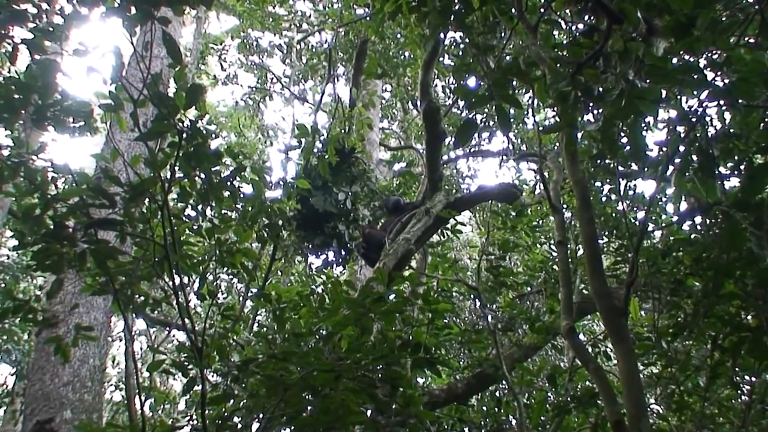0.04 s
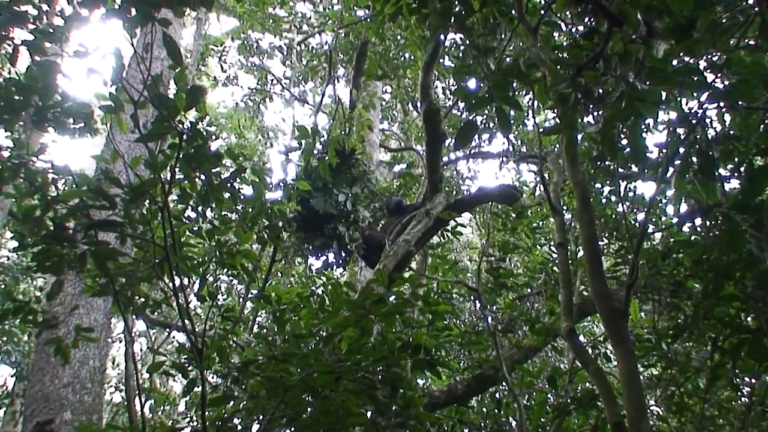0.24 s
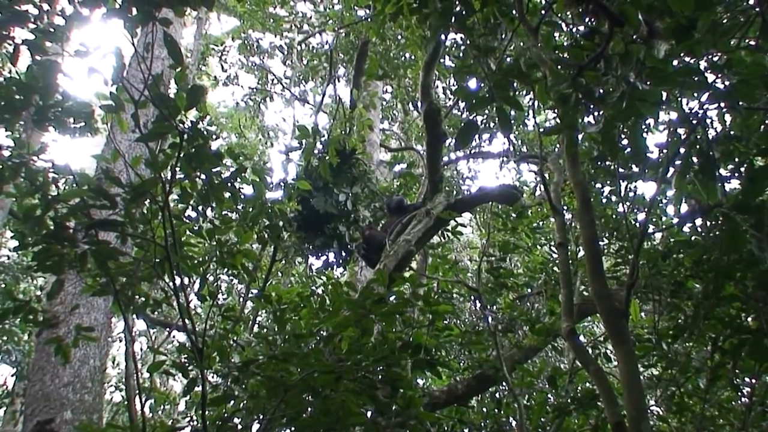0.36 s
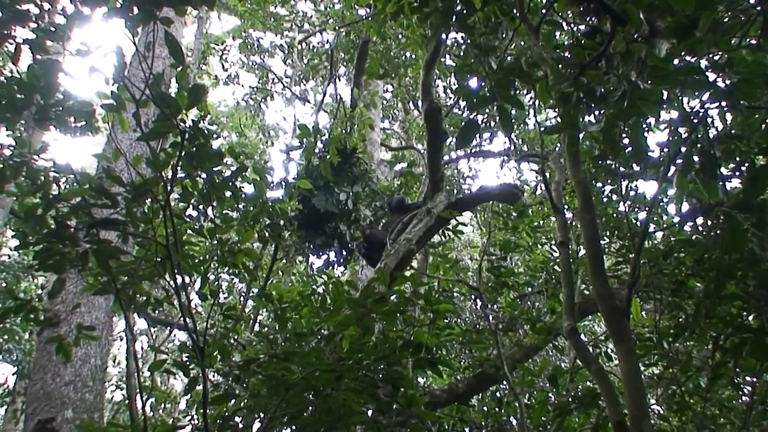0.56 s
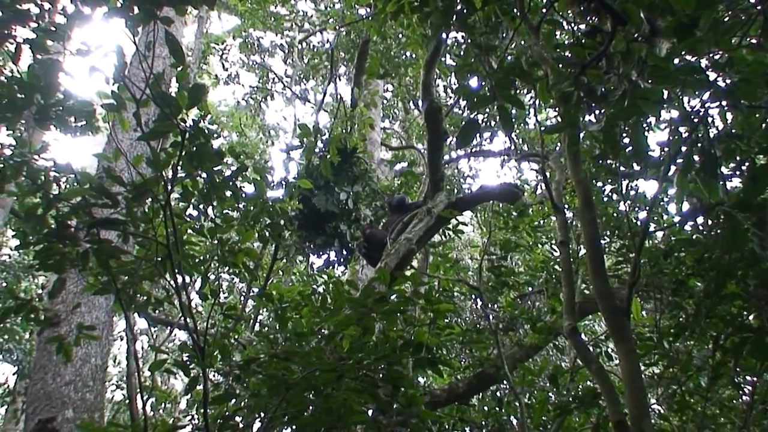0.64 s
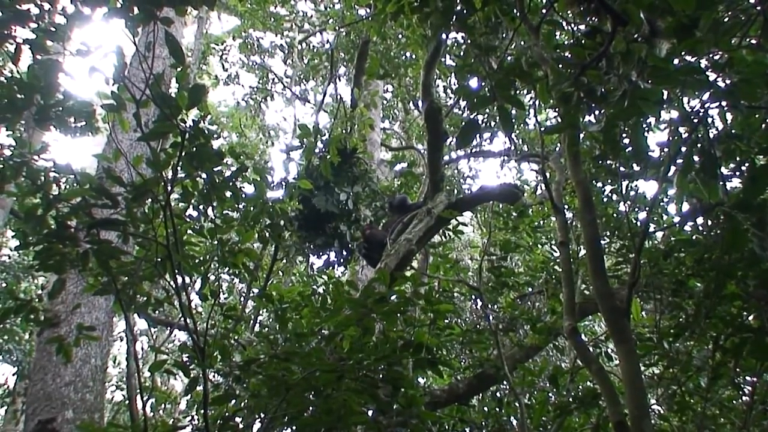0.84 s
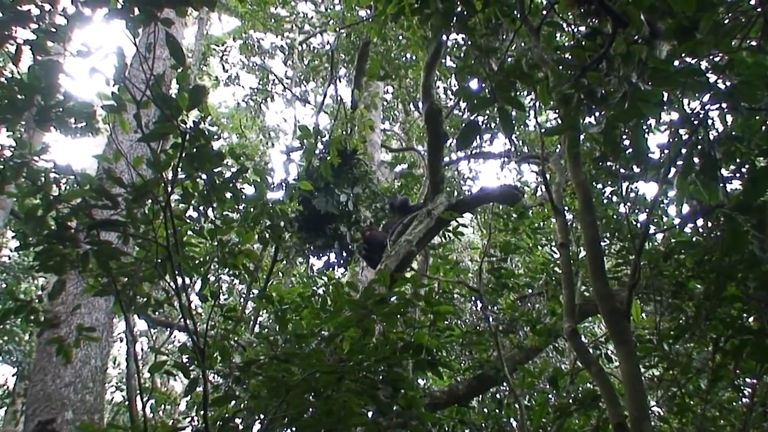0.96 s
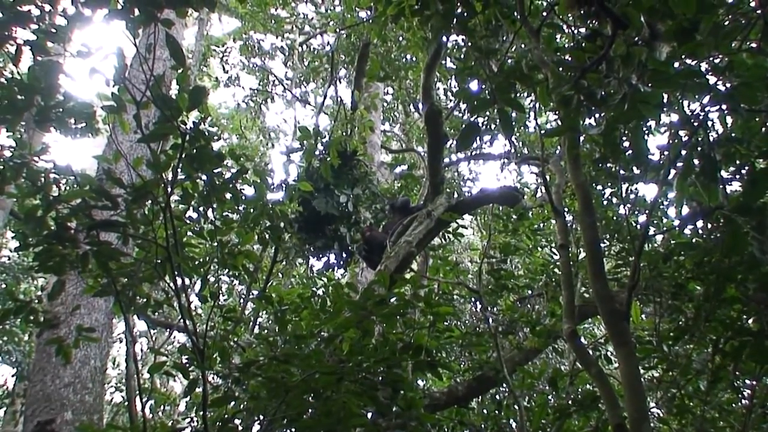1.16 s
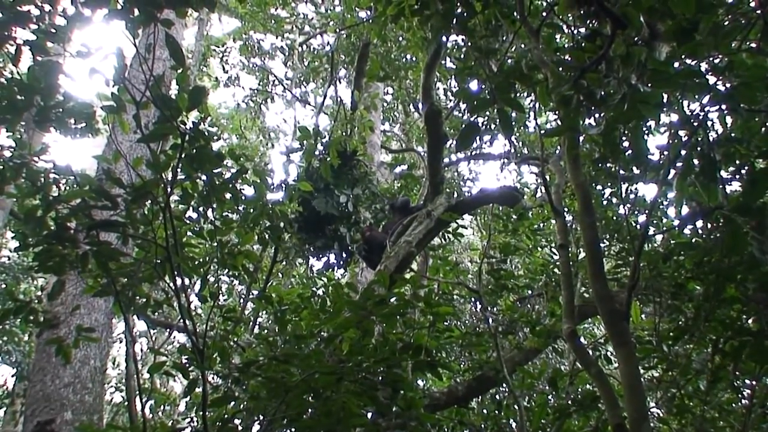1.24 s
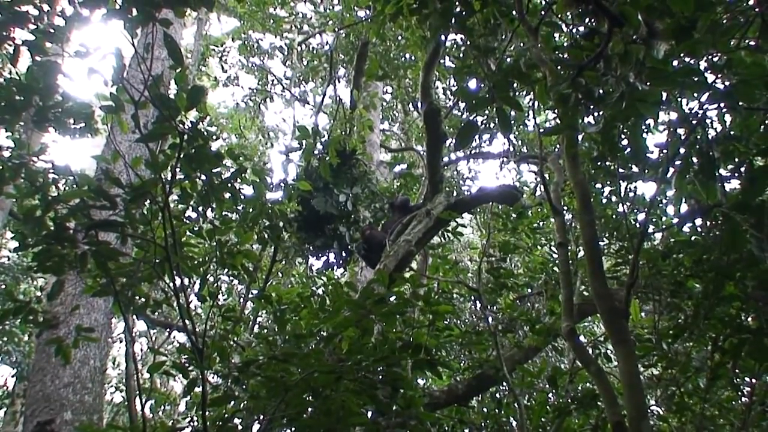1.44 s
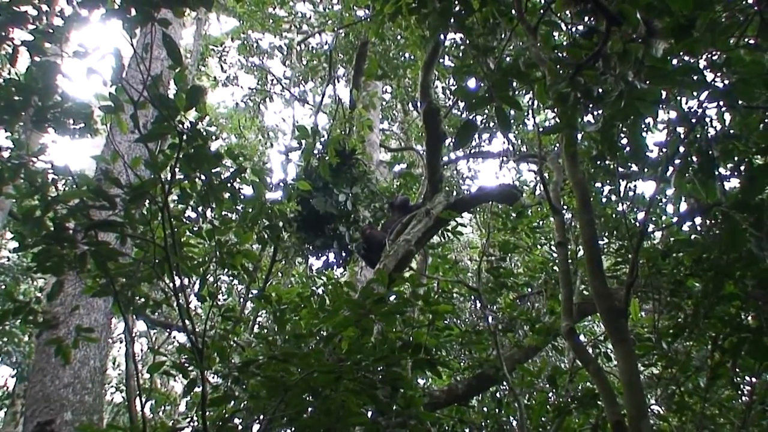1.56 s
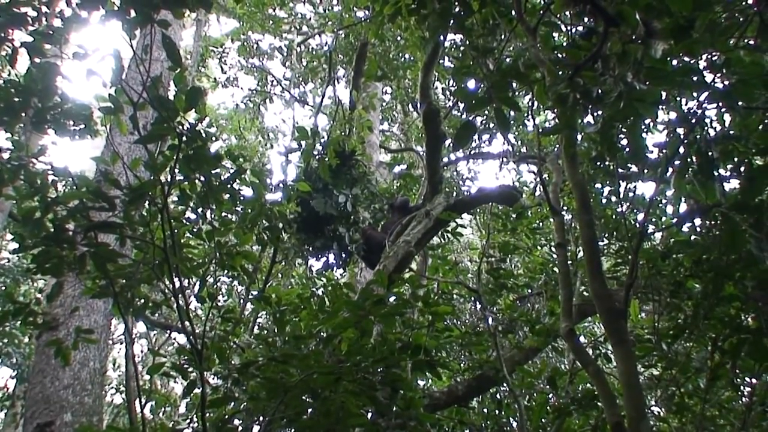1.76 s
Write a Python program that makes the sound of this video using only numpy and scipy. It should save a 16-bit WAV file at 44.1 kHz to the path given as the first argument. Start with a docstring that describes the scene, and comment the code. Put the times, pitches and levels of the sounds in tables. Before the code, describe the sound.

A chimpanzee gives two loud, hoarse hoots in quick succession, each rising then falling in pitch and lightly thumping the microphone. They echo through the forest as an insect hiss swells and a distant animal answers faintly.

```python
"""An earlier hoot is dying away in a forest as a chimpanzee gives two loud, hoarse hoots from a tree.
Each arches up and falls in pitch: jittery vocal folds are the source, the throat and mouth the filter.
The loudest peaks thump the microphone, and leaves and trunks scatter each hoot into a long echo.
As it decays, insects hiss and swell over the steady air, and a far animal answers faintly."""
import sys
import numpy as np
from scipy import signal
from scipy.fft import rfft, irfft
from scipy.io import wavfile
from scipy.ndimage import uniform_filter1d, minimum_filter1d

SR = 44100
rng = np.random.default_rng(int(sys.argv[2]) if len(sys.argv) > 2 else 0)


def unload_wav(signal):
    """Save mono or channel-first audio to the path in sys.argv[1] as 16-bit WAV at rate SR, clipped to [-1, 1]."""
    wavfile.write(
        sys.argv[1],
        SR,
        np.round(np.clip(np.atleast_2d(signal).T, -1, 1) * 32767).astype(np.int16),
    )


N = 79380
T = np.arange(N) / SR


def amp(db):
    """Amplitude grows tenfold for every 20 dB."""
    return 10 ** (np.asarray(db) / 20)


def unit(x):
    """Normalisation to an rms of 1."""
    return x / np.sqrt(np.mean(x ** 2) + 1e-20)


def read(points, hz):
    """Interpolation of (Hz, value) points on a log-frequency axis."""
    f, value = np.transpose(points)
    return np.interp(np.log(hz + 1), np.log(f), value)


def colour(x, points):
    """Minimum-phase filtering: a curve of (Hz, dB) points determines a causal response."""
    size = 2 * N
    log_gain = np.log(amp(read(points, abs(np.fft.fftfreq(size, 1 / SR)))))
    response = np.exp(np.conj(signal.hilbert(log_gain)))[:N + 1]
    return irfft(rfft(x, size) * response)[..., :N]


def wobble(rate_hz):
    """Low-passed noise gives smooth random motion up to the given rate."""
    hz = np.fft.rfftfreq(N, 1 / SR)
    return unit(irfft(rfft(rng.standard_normal(N)) / (1 + (hz / rate_hz) ** 4), N))


# Likeness of the background in both ears. Each row: frequency in Hz, correlation from 0 to 1.
EAR_CORRELATION = [(30, 0.2), (60, 0.75), (125, 0.94), (300, 0.99), (2000, 1), (5000, 0.97), (9000, 0.9),
                   (12000, 0.3)]

def hiss(spectrum, patchy_db):
    """A diffuse field: partly correlated noise at two ears, with small drifting patches of level."""
    frames, hz = N // 256 + 5, np.fft.rfftfreq(1024, 1 / SR)
    mid_re, mid_im, side_re, side_im, patches = rng.standard_normal((frames, 513, 5)).T
    patches = uniform_filter1d(patches, size=12, axis=0)
    patches = unit(uniform_filter1d(patches, size=10, axis=1))
    correlation = np.clip(read(EAR_CORRELATION, hz), 0, 1)[:, None]
    mid = np.sqrt(1 + correlation) * (mid_re + 1j * mid_im)
    side = np.sqrt(1 - correlation) * (side_re + 1j * side_im)
    bands = np.array([mid + side, mid - side]) * amp(read(spectrum, hz)[:, None] + patchy_db * patches)
    return unit(signal.istft(bands, nperseg=1024, noverlap=768)[1][:, :N])


# Spectrum of the air. Each row: frequency in Hz, relative spectral density in dB.
AIR_SPECTRUM = [(20, -20.5), (60, -6), (150, -2.5), (300, -3), (600, -4), (1200, -1), (2000, -16.5),
                (3000, -13.5), (4300, -17), (5200, -18.5), (7000, -21), (9500, -33), (12000, -30.5)]

def forest_air():
    """Stationary noise: the air keeps a steady overall level."""
    return amp(-40) * hiss(AIR_SPECTRUM, patchy_db=0.5)


# Spectrum of the chorus. Each row: frequency in Hz, relative spectral density in dB.
INSECT_SPECTRUM = [(200, -40), (450, -6), (650, -26), (1000, -10), (1350, 3.5), (2000, 1), (3000, 1.5),
                   (3700, -2), (4400, -1), (5200, -5.5), (6500, -7), (8500, -12.5), (10000, -17.5),
                   (12000, -29)]
# Its swell. Each row: time in seconds, level in dB.
INSECT_SWELL = [(0, -50), (.6, -46.5), (.95, -43), (1.1, -42.5), (1.27, -38), (1.38, -40), (1.5, -36.5),
                (1.62, -34.5), (1.73, -34), (1.8, -37)]

def insects():
    """Incoherent summation: a chorus merges into one hiss, which slowly swells."""
    swell = amp(np.interp(T, *np.transpose(INSECT_SWELL)))
    return swell * hiss(INSECT_SPECTRUM, patchy_db=2.0)


# The far animal's answer. Each row: start in seconds, length in seconds, pitch in Hz, peak level in dB.
FAR_CALLS = [(1.293, 0.081, 1304, -37), (1.642, 0.086, 1316, -48), (1.762, 0.074, 1310, -34)]

def far_calls():
    """Slight phase modulation makes short, nearly pure notes waver."""
    out = np.zeros(N)
    for start, length, hz, db in FAR_CALLS:
        envelope = np.sin(np.pi * np.clip((T - start) / length, 0, 1))
        out += amp(db) * envelope * np.sin(2 * np.pi * hz * T + 0.25 * wobble(51))
    return out


# Spectrum of the earlier hoot's echo. Each row: frequency in Hz, relative level in dB.
EARLIER_SPECTRUM = [(300, -32), (520, -8.5), (670, 2), (800, -7), (1000, -7), (1250, -2), (1450, -16),
                    (2000, -21), (2800, -23.5), (4500, -29.5), (9000, -54)]

def earlier_hoot(pitch_hz=650, gain_db=-25.5, fade_db_per_s=67):
    """Reverberation smears a hoot into noise and a wavering tone, which decay exponentially."""
    smear = unit(colour(rng.standard_normal(N), EARLIER_SPECTRUM))
    tone = wobble(18) * np.sin(2 * np.pi * pitch_hz * T)
    return (smear + .5 * tone) * amp(gain_db - fade_db_per_s * T)


# Thumps, placed at the loudest peaks. Each row: start in seconds, level in dB before panning.
THUMPS = [(.262, -31), (.611, -38), (.652, -28)]

def microphone_thumps(rise_s=.0026, rebound_s=.03, rebound=.22, right_over_left_db=3):
    """Overload: the microphone is pushed off centre and swings back more slowly."""
    out = np.zeros(N)
    for start, db in THUMPS:
        age = np.maximum(T - start, 0)
        push = age / rise_s
        back = (age / rebound_s) ** 2 / 2
        out += amp(db) * (rebound * back * np.exp(1 - back) - push * np.exp(1 - push))
    return out * amp([[-right_over_left_db / 2], [right_over_left_db / 2]])


# Stereo width of the reflections. Each row: frequency in Hz, side level against middle in dB.
ECHO_WIDTH = [(400, -37), (700, -38.5), (1200, -36.5), (2500, -21), (5000, -17.5), (10000, -22.5)]

def scatter(t60, build_s):
    """Dense reflections form a noise-like impulse response that builds up and decays band by band."""
    mid, side = rng.standard_normal((2, N))
    side = colour(side, ECHO_WIDTH)
    hz, t, bands = signal.stft(np.array([mid + side, mid - side]), SR, nperseg=256)
    decay = amp(-60 * t / read(t60, hz)[:, None])
    tail = signal.istft(bands * decay, SR, nperseg=256)[1][:, :N]
    tail *= 1 - np.exp(-T / build_s)
    return tail / np.linalg.norm(tail[0])


# Colour of the scatter from leaves and from trunks. Each row: frequency in Hz, relative gain in dB.
LEAF_COLOUR = [(400, -11), (800, 3.5), (1500, 4.5), (3000, 7.5), (10000, -0.5)]
TRUNK_COLOUR = [(300, 0), (600, -7), (820, -3.5), (1100, -6), (1600, 0.5), (2800, 2), (5000, 10.5),
                (10000, 12.5)]
# Reverberation among trunks. Each row: frequency in Hz, time to fall by 60 dB in seconds.
TRUNK_T60 = [(300, 1.4), (800, 1.29), (1500, 1.31), (2800, 1.05), (5000, 0.68), (10000, 0.58)]

def forest(direct):
    """Convolution adds quick scatter from nearby leaves and a long echo among trunks."""
    leaves = amp(-8.5) * colour(scatter(t60=[(1000, .19)], build_s=.015), LEAF_COLOUR)
    trunks = amp(-6.5) * colour(scatter(TRUNK_T60, build_s=.025), TRUNK_COLOUR)
    return direct + signal.fftconvolve(direct[None], leaves + trunks, axes=1)[:, :N]


# Half tones of the voice. The entries: relative levels in dB at 1.5, 2.5 and 3.5 times the pitch.
HALF_TONES_DB = [-19.5, 2, -7.5]

def vocal_folds(pitch, roughness, half_db, jitter=.02097, jitter_hz=165.7, db_per_octave=-5.5):
    """Irregular vibration gives jittery harmonics, half tones between them and a pulsed rasp."""
    hz = pitch * (1 + jitter * (.5 + 2 * roughness) * wobble(jitter_hz))
    phase = 2 * np.pi * np.cumsum(hz) / SR
    overtones = sum(amp(db_per_octave * np.log2(k)) * np.cos(k * phase) for k in range(2, 14))
    overtones *= amp(-.0252 * np.maximum(pitch - 690, 0))  # the tone grows purer above 690 Hz
    slipping_phase = phase + .39 * wobble(jitter_hz)
    half_tones = sum(amp(half_db + own_db) * np.cos((k + .5) * slipping_phase)
                     for k, own_db in enumerate(HALF_TONES_DB, 1))
    voiced = np.cos(phase) + overtones + half_tones
    breath = colour(rng.standard_normal(N), [(300, -17.5), (650, -3), (1400, -5.5), (11200, -16.5)])
    rasp = amp(1.5) * unit(breath * (1 + .56 * np.cos(phase)))
    return np.sqrt(1 - roughness) * voiced + np.sqrt(roughness) * rasp


# Course of each hoot. Each row: time in seconds, pitch in Hz, source level in dB,
# roughness from 0 to 1, half-tone gain in dB, treble gain in dB.
FIRST_HOOT = [(.196, 550, -29, .35, -18, -14), (.2065, 570, -25, .35, -16, -13),
              (.209, 590, -15, .35, -14, -8), (.228, 630, -16, .6, -10, -4), (.241, 770, -12, .22, -8, -1),
              (.265, 808, -11, .15, -6, 1), (.29, 680, -10, .1, -15, 1), (.315, 530, -17.5, .2, -18, -1),
              (.342, 380, -28, .2, -18, -4)]
SECOND_HOOT = [(.551, 460, -29, .6, -18, -12), (.558, 600, -27, .5, -18, -12),
               (.561, 630, -17, .3, -18, -14), (.582, 700, -20, .55, -16, -13),
               (.589, 818, -12, .04, -7, -2), (.613, 830, -11, .05, -8, 1), (.638, 790, -11.5, .07, -14, 2),
               (.656, 725, -11, .06, -22, 0), (.684, 560, -14, .12, -19, 1), (.71, 460, -23, .2, -18, -3),
               (.735, 370, -33, .3, -18, -4)]
# Resonances of throat and mouth in each hoot. Each row: frequency in Hz, gain in dB.
FIRST_THROAT = [(200, -37.5), (400, -8.5), (600, -3), (800, 1.5), (950, 2), (1170, 10), (1380, 0.5),
                (1650, -0.5), (1830, -8), (2020, -11.5), (2550, -7.5), (2900, -4), (3150, -11.5),
                (4000, -14.5), (4450, -14.5), (4950, -22), (8000, -27), (12000, -47)]
SECOND_THROAT = [(200, -30.5), (400, -9), (580, 0), (830, 2.5), (950, 2), (1150, 0), (1450, 8.5),
                 (1680, 0.5), (1820, -18), (2050, -8), (2250, -13.5), (2650, 0), (3100, -11), (3500, -9),
                 (3950, -24.5), (5300, -17.5), (6300, -24.5), (9000, -23), (12000, -42)]

def hoot(course, throat, throb_crest_s, throb_hz=48, treble_hz=1490, edge_s=.0027):
    """Source and filter: the folds throb as the voice is forced, and the throat shapes their spectrum."""
    times, *columns = np.transpose(course)
    pitch, db, roughness, half_db, treble_db = (np.interp(T, times, column) for column in columns)
    source = vocal_folds(pitch, np.clip(roughness, 0, 1), half_db)
    lows = signal.sosfiltfilt(signal.butter(4, treble_hz, fs=SR, output="sos"), source)
    source = lows + amp(treble_db) * (source - lows)
    onset = np.clip((T - times[0]) / edge_s + 1, 0, 1)
    release = np.clip((times[-1] - T) / edge_s + 1, 0, 1)
    effort = amp(db - db.max())
    throb_db = 3.5 * effort * np.cos(2 * np.pi * throb_hz * (T - throb_crest_s))
    shimmer_db = 1.2 * wobble(rate_hz=66)
    return colour(source * onset * release * amp(db + throb_db + shimmer_db), throat)


def scene():
    """Superposition: two hoots, each with its own scatter, add to the quieter sounds."""
    first = forest(hoot(FIRST_HOOT, FIRST_THROAT, throb_crest_s=.244))
    second = forest(hoot(SECOND_HOOT, SECOND_THROAT, throb_crest_s=.592))
    return first + second + earlier_hoot() + far_calls() + forest_air() + insects() + microphone_thumps()


def record(dry, ceiling=.9, cutoff_hz=12400):
    """Peak limiting holds the sound under a ceiling; a low-pass filter then limits the band."""
    gain = ceiling / np.maximum(abs(dry).max(0), ceiling)
    gain = uniform_filter1d(minimum_filter1d(gain, size=300), size=300)
    low_pass = signal.firwin(511, cutoff_hz, window=("kaiser", 9), fs=SR)
    return signal.oaconvolve(dry * gain, low_pass[None], "same")


dry = scene()
out = record(dry)
unload_wav(out)
```